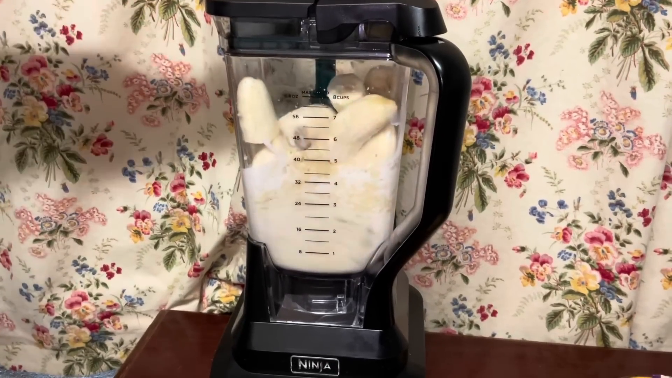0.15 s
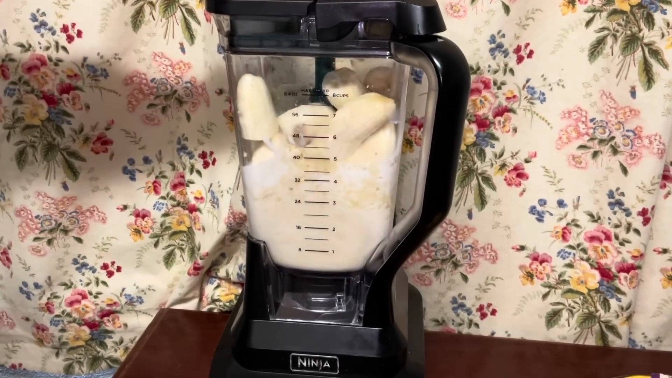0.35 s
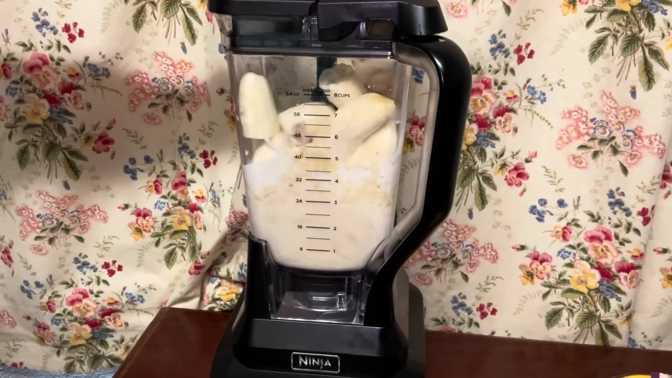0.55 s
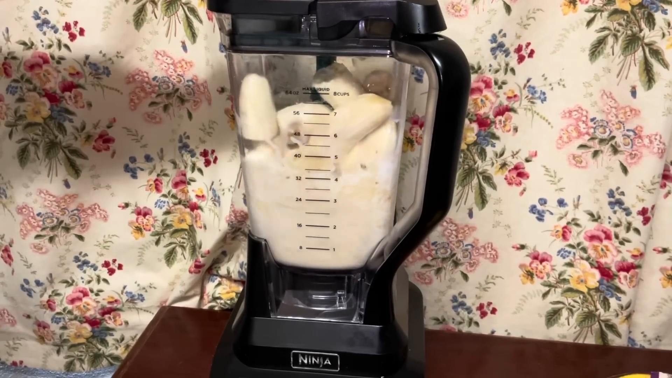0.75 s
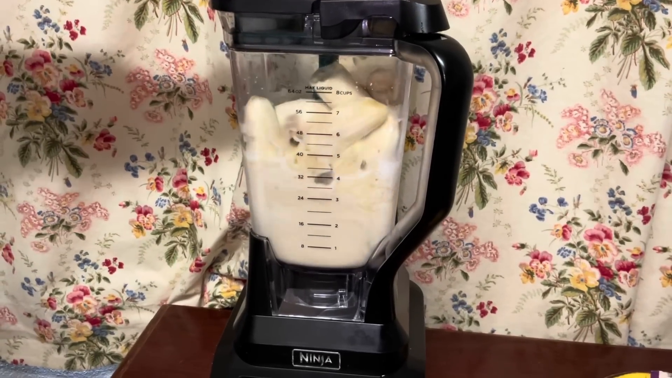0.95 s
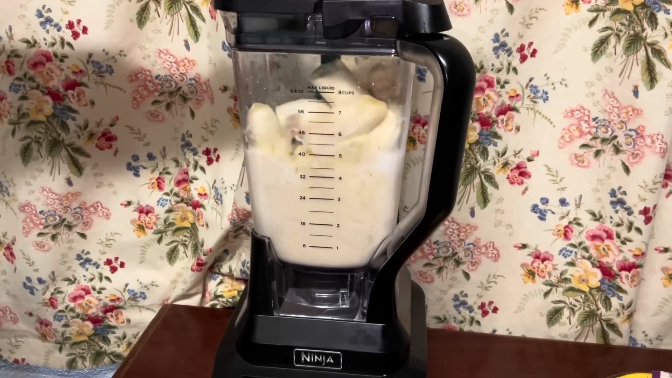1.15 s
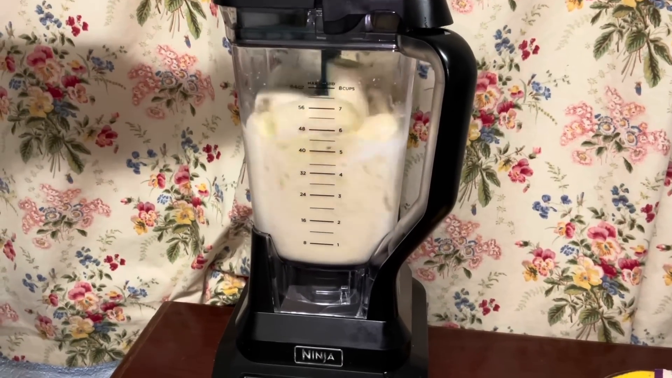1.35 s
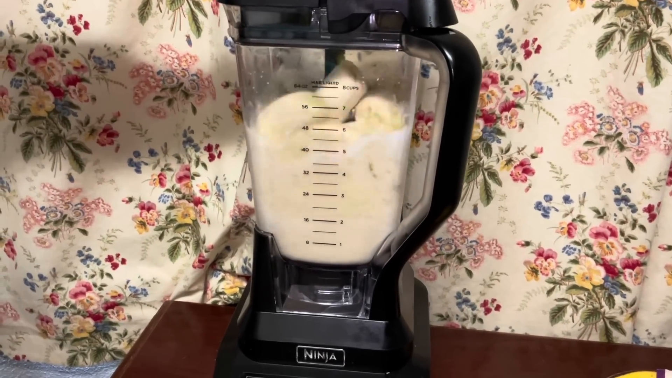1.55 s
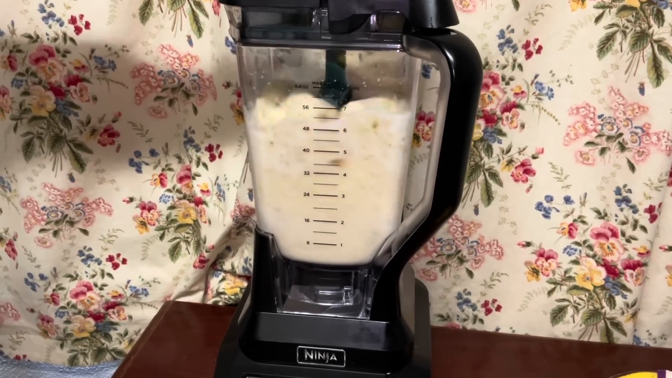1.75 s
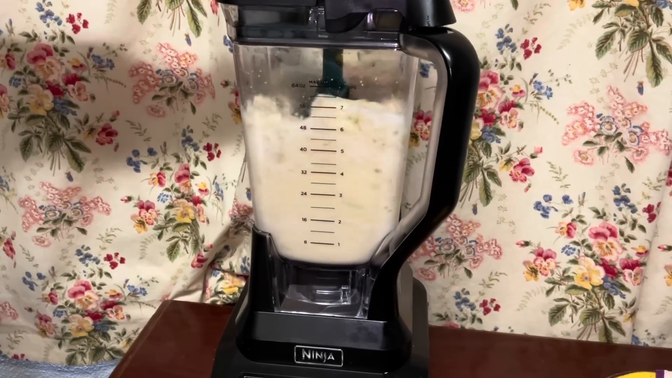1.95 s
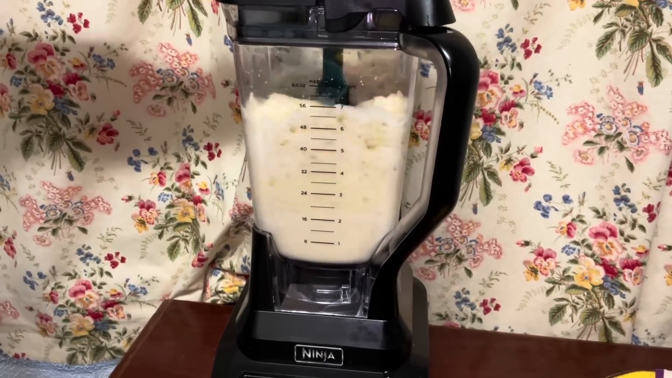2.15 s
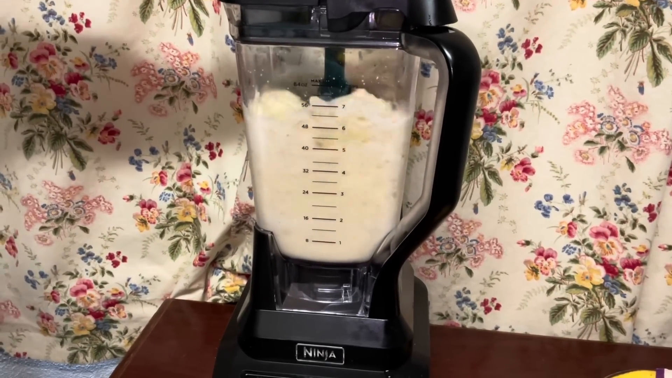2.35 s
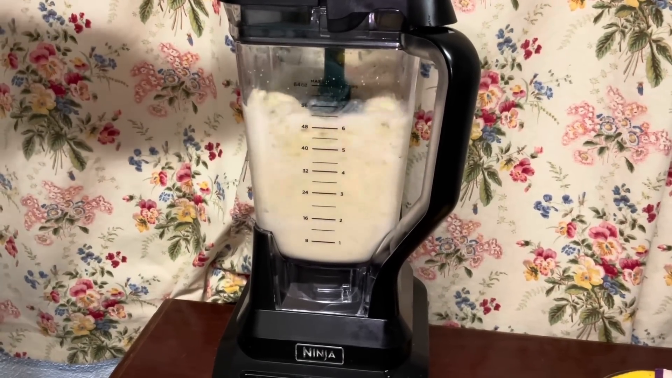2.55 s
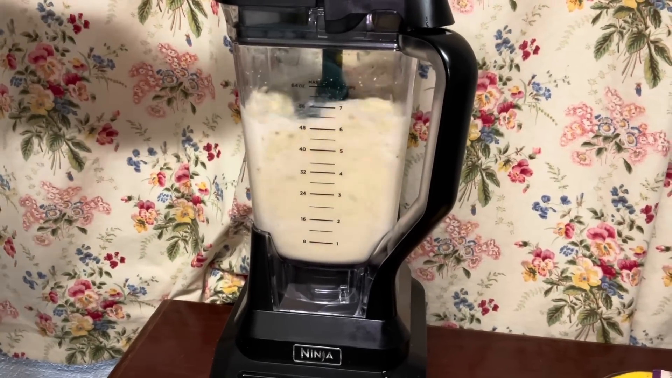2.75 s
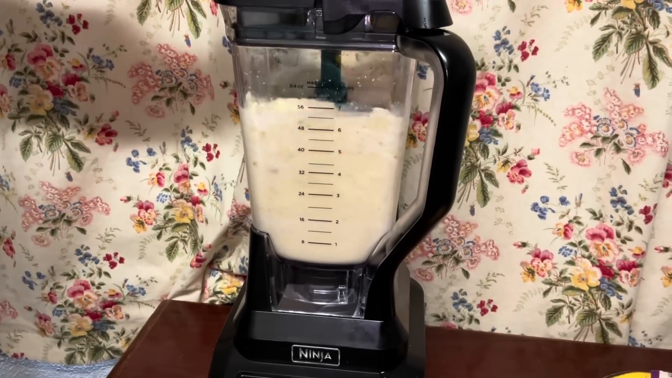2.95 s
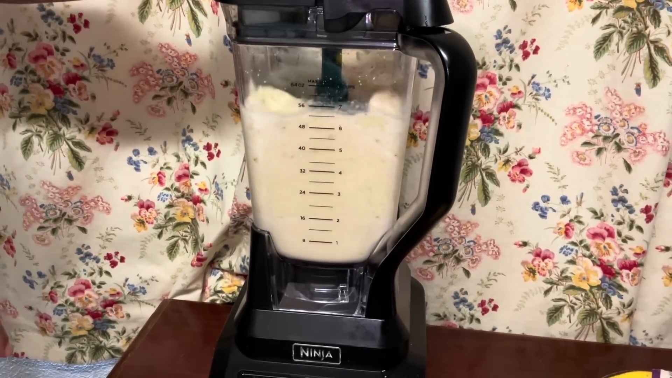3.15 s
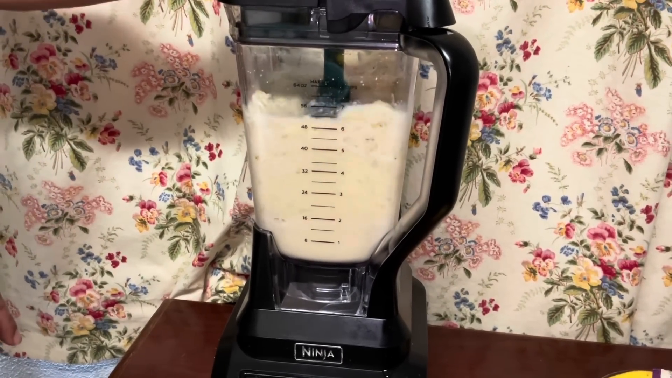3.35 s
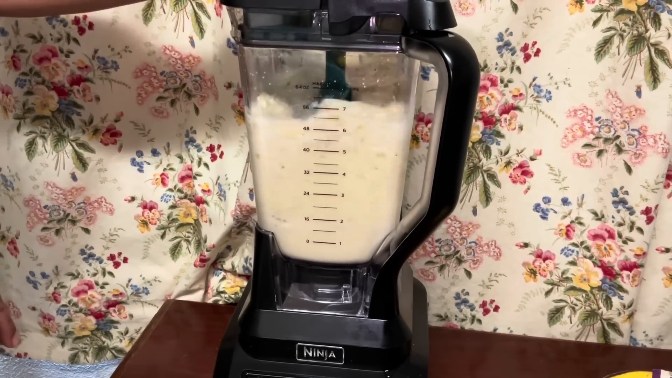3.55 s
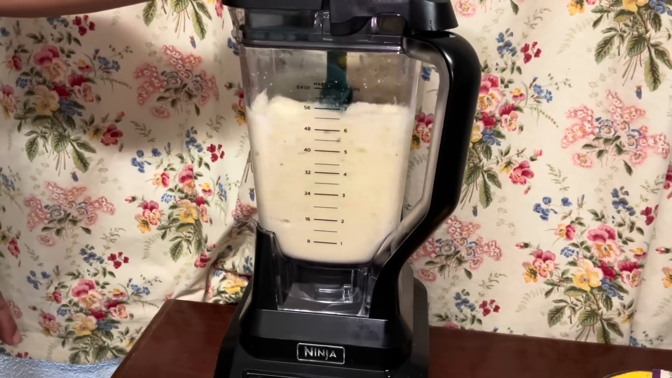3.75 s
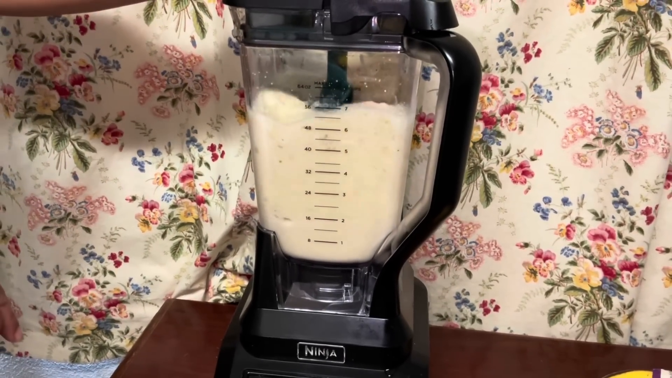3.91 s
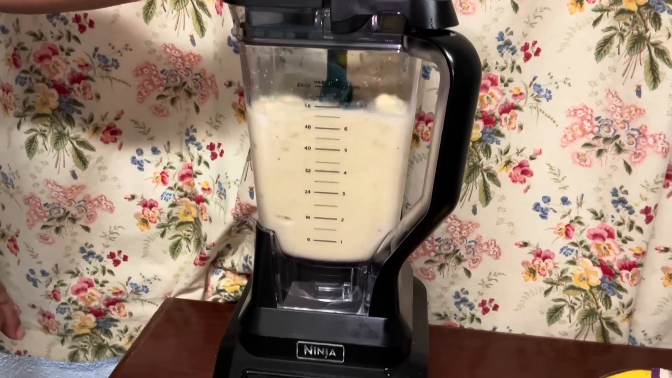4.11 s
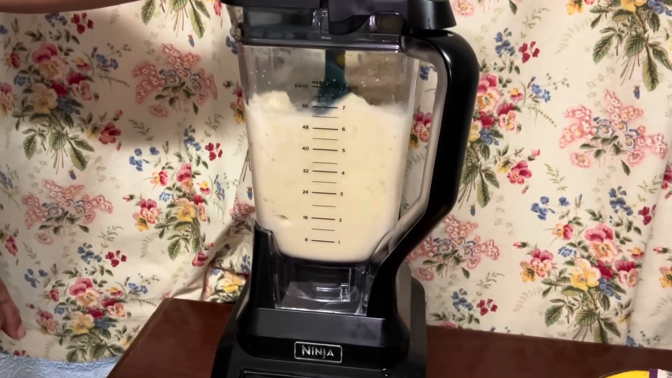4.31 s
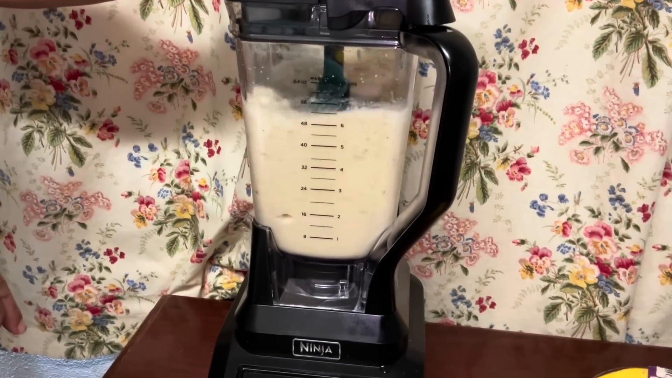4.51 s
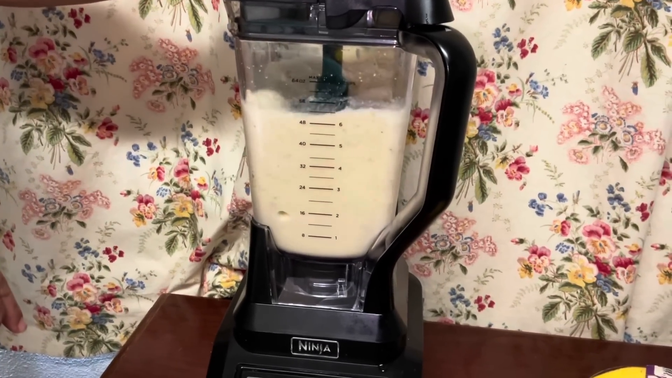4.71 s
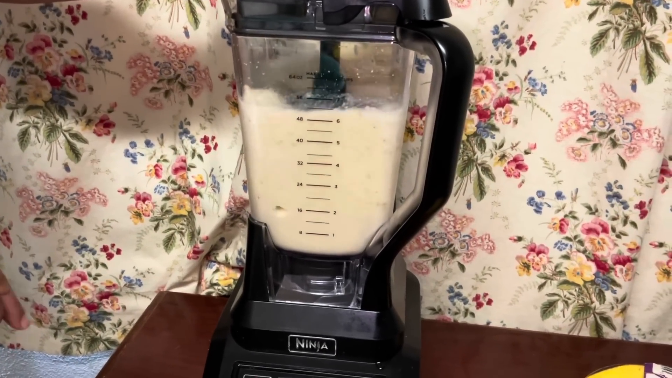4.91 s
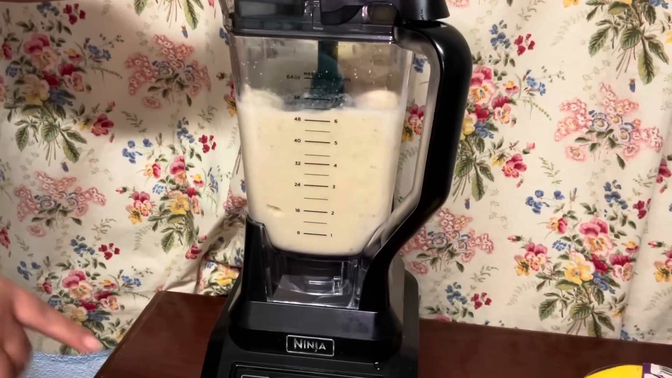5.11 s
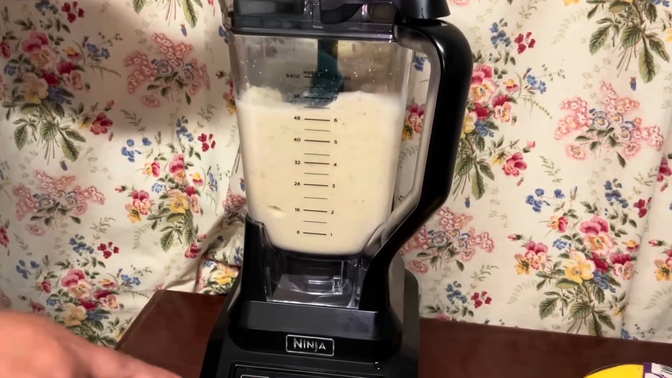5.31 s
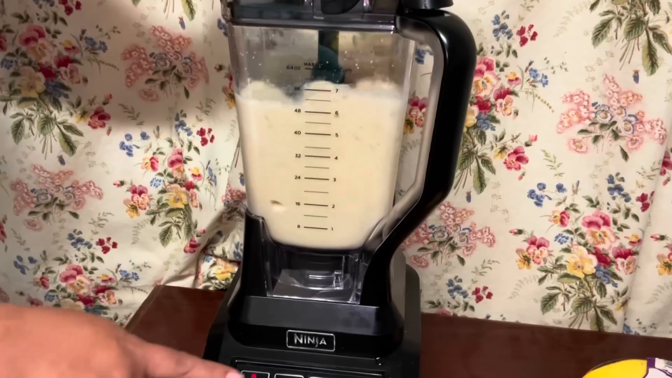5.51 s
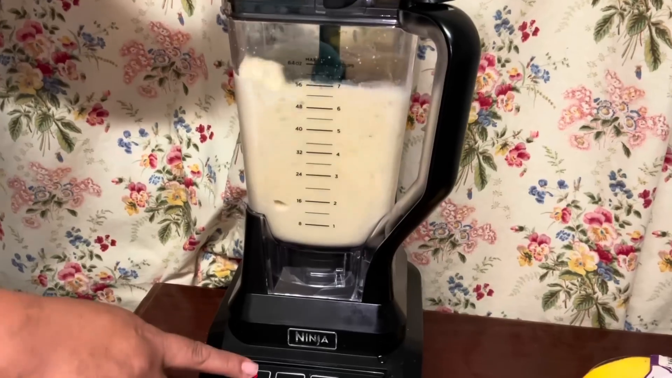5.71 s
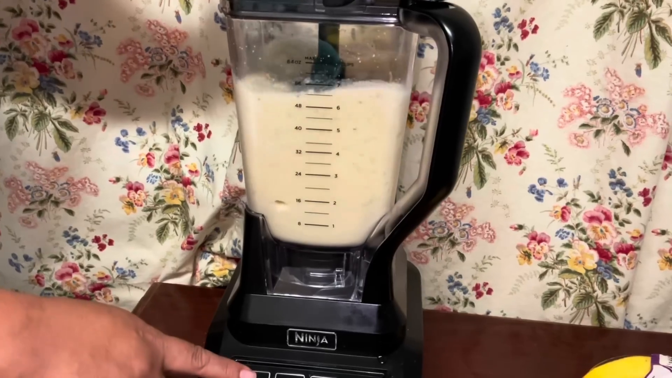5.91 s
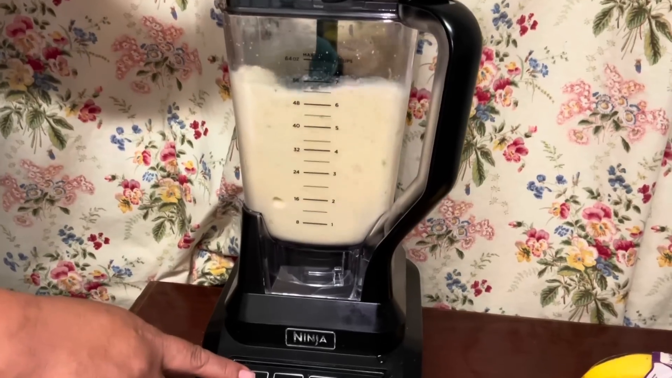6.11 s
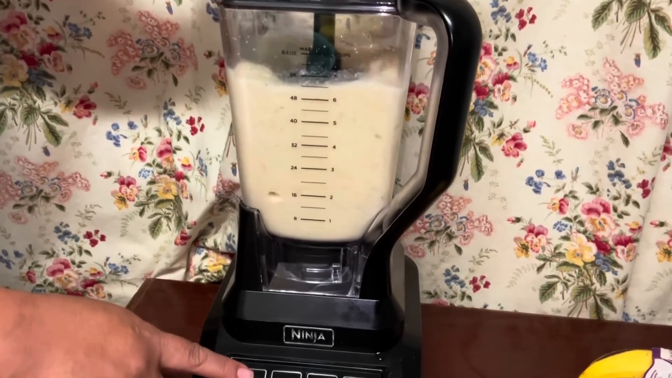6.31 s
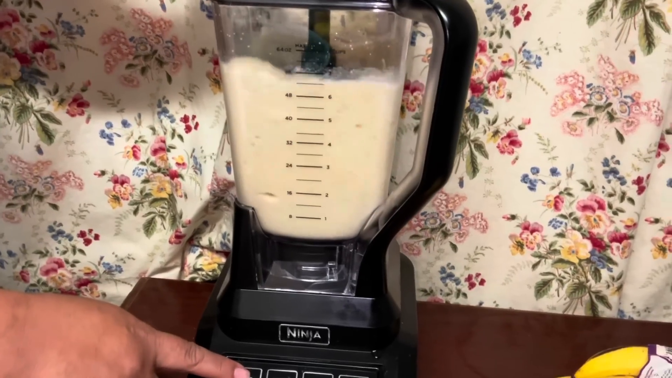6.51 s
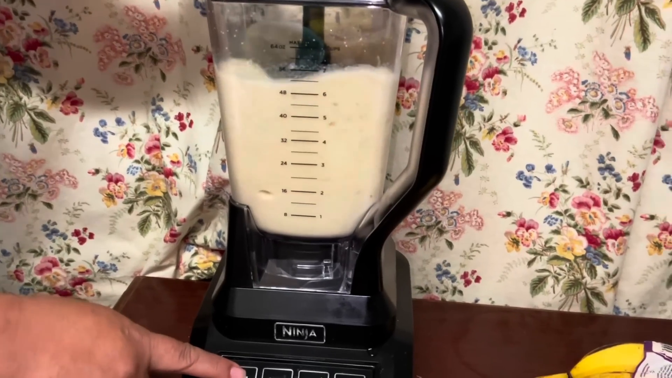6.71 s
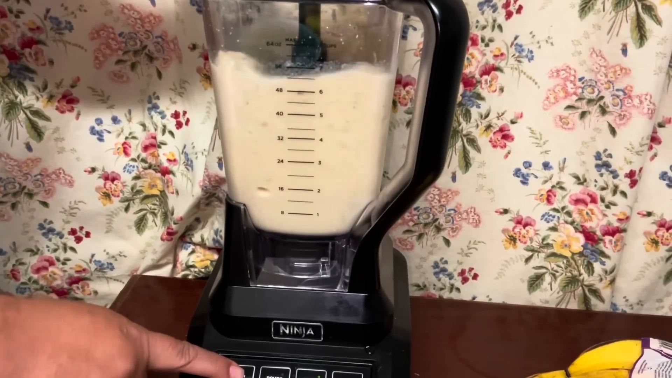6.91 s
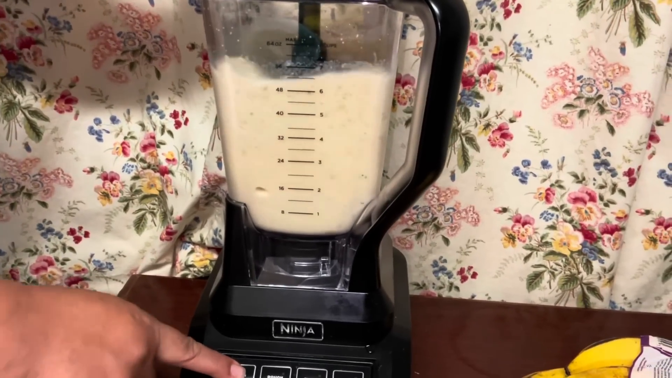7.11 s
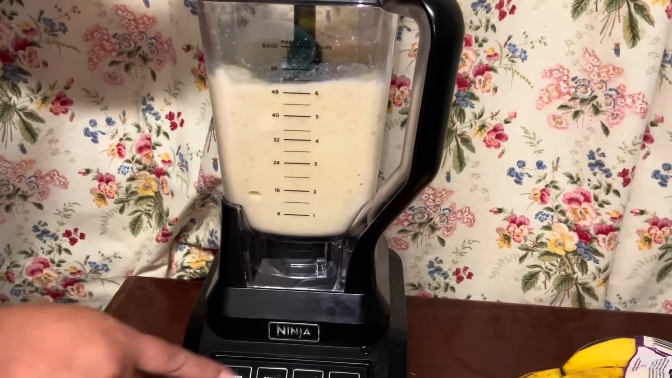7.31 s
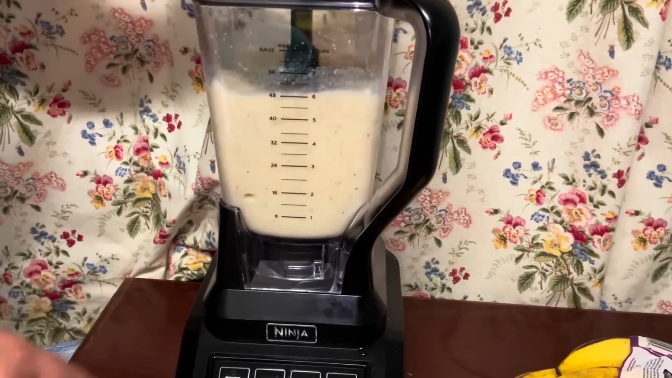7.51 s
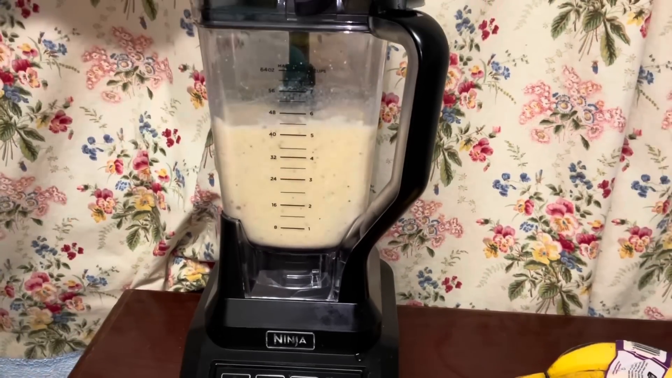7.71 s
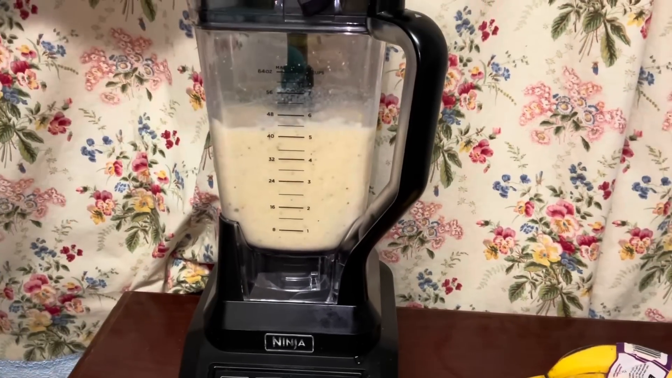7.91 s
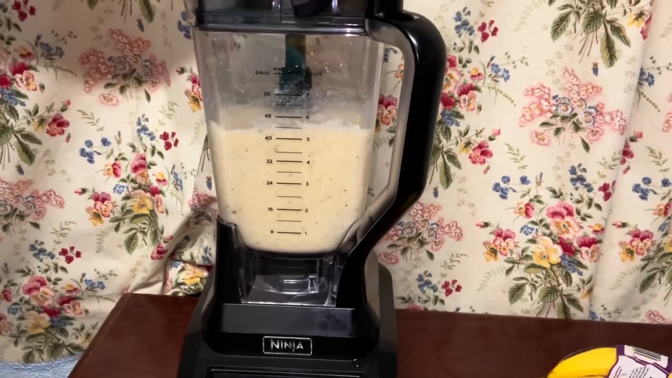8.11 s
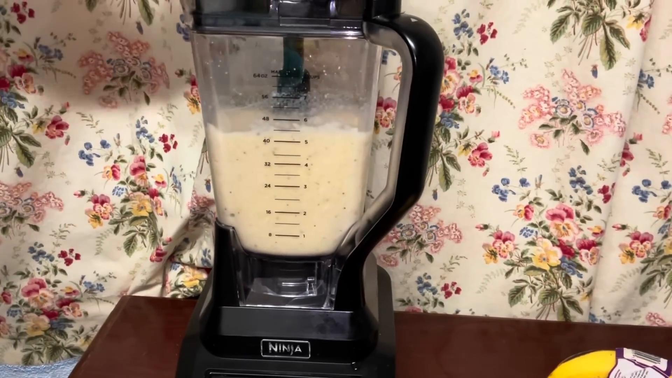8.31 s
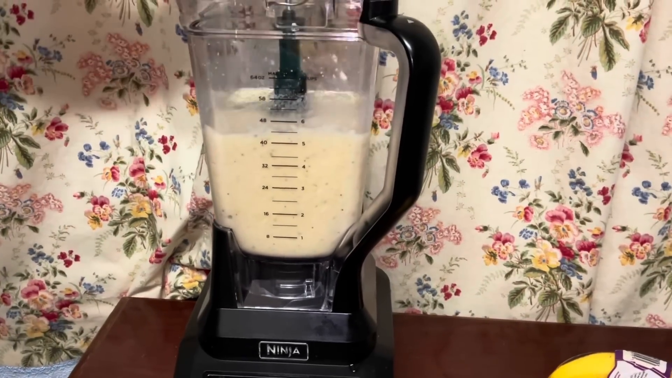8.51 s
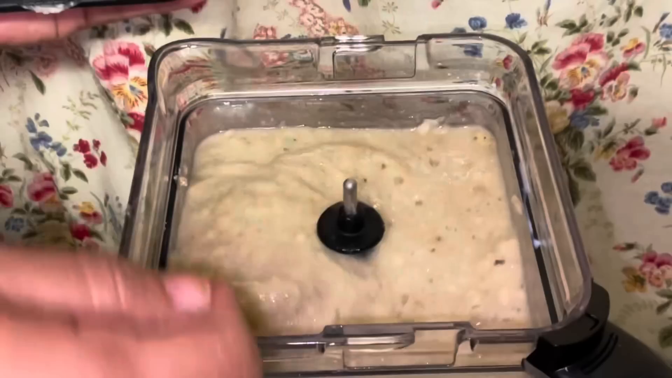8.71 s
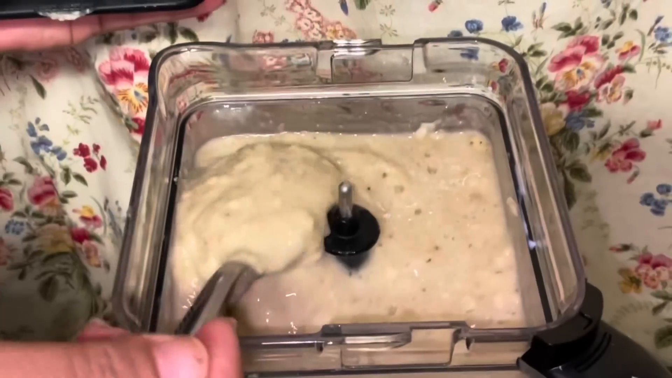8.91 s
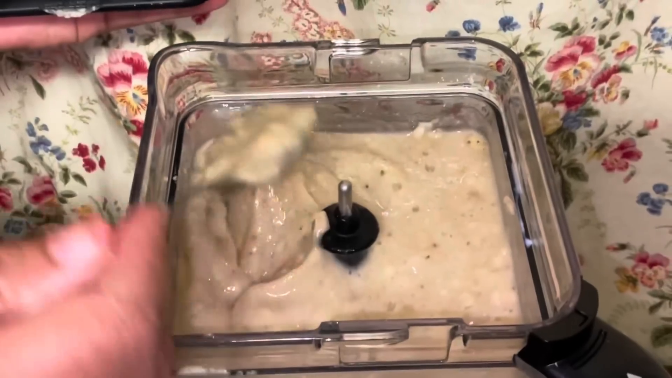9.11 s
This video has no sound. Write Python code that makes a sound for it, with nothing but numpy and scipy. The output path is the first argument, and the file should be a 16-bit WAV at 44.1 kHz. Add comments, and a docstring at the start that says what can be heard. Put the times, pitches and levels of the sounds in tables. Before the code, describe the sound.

From 0 s a blender runs at full power very close to the microphone: a low, buzzing drone, thick wet churning, broad airy hiss and a thin, piercing whine around 5.5 kHz. In the first one to two seconds it is slightly louder and rougher while fruit lumps are chopped; the whine weakens around 1.5 s, then returns, wavering in strength over a steady roar. At about 7 s the power goes off; drone and whine slide downward and weaken, but the sound breaks off abruptly at 7.6 s before the motor stops. A quiet kitchen with faint low hum remains. At 7.7 s a loud, sharp double plastic snap rings briefly with short room echo, followed by a smaller knock at 7.9 s. Light clicks and lid knocks run from 8.1 to 8.8 s, with a short, uneven rub around 8.35 s. At 8.95 s a dull, damped spoon tap ends it.

```python
"""A blender drones and whines close by as it purees banana and milk; switched off, it begins to coast down, and its
sound breaks off abruptly while it is still slowing.
Shaft harmonics give the drone and commutation the whine; filtered noise gives the churning and the hiss of air.
In the quiet kitchen the lid latch snaps open and the lid is worked off: noise bursts with decaying modes, then a rub.
Last, a spoon taps the wet jar, a short damped burst. Two microphone ports differ in phase and level; a room echoes."""
import sys
import numpy as np
from scipy import signal
from scipy.fft import rfft, irfft, next_fast_len
from scipy.io import wavfile
from scipy.ndimage import uniform_filter1d

SR = 44100
rng = np.random.default_rng(int(sys.argv[2]) if len(sys.argv) > 2 else 0)


def digitize_waveform(pressure):
    """Quantize a signal to 16-bit integers and store it at the path in sys.argv[1].

    Rows of a 2-D input are taken as channels; values are limited to [-1, 1].
    """
    field = np.atleast_2d(pressure).T
    bounded = np.clip(field, -1, 1)
    quanta = np.round(bounded * 32767).astype(np.int16)
    wavfile.write(sys.argv[1], SR, quanta)


N = 403515
T = np.arange(N) / SR
SIZE = next_fast_len(N + SR)
FREQ = np.maximum(np.fft.rfftfreq(SIZE, 1 / SR), 1)

# motor under power: [t/s, whine pitch f/Hz]
MOTOR_PITCH = [(0.0, 5498), (0.36, 5550), (0.66, 5516), (0.9, 5528), (1.2, 5492), (1.38, 5447),
               (1.75, 5455), (1.92, 5451), (2.94, 5493), (3.06, 5478), (3.18, 5490), (4.14, 5520),
               (4.44, 5500), (5.46, 5514), (6.12, 5490), (6.42, 5506), (6.92, 5510)]
GEAR_RATIO, COMMUTATOR_BARS = 4, 24
# once switched off, drag slows the shaft in proportion to its speed and friction at a steady rate
OFF_S, DRAG_S, FRICTION_HZ_PER_S = 6.975, .76, 20.4
# the sound of the machine breaks off abruptly while the shaft still turns
BREAK_OFF_S, BREAK_OFF_FADE_S = 7.615, 0.026
# time in which the lumps of fruit are cut down to about a third
LUMPS_S = 0.99

# laws of each layer: (relative level/dB in smooth puree at full speed, level/dB added by whole lumps,
# power of the speed that the amplitude follows)
DRONE_LAW = (-22.5, 1, 1.95)
RUMBLE_LAW = (-43.5, 3.6, 0.72)
CHURN_LAW = (-26, .8, 0.95)
CHOP_LAW = (-31, 4, 1.75)
AIR_LAW = (-26.5, 3.05, 1.99)

# shaft harmonics: [multiple of the turn rate, relative level/dB]
SHAFT_HARMONICS = [(1, -43.5), (2, -39.5), (3, -26), (4, -29.5), (5, -39.5), (6, -31), (7, -44), (8, -35),
                   (9, -36.5), (10, -42.5), (11, -39.5), (12, -41), (15, -53), (16, -38.5), (44, -35),
                   (48, -51), (52, -29.5), (176, -49.5), (188, -47.5), (208, -59.5)]
# resonance of the table top under the blade strokes: centre, width and level at the peak
TABLE_HZ, TABLE_WIDTH_HZ, TABLE_DB = 76, 18, -32

# turbulence through jar and housing: [f/Hz, relative spectral level/dB]
TURBULENCE_COLOUR = [(30, -37), (46, -32), (72, -10), (100, -23), (150, -0.5), (260, 2), (400, 1),
                     (520, -3), (760, -6.5), (1400, -12.5), (1800, -7), (2350, -8), (2900, -13),
                     (4700, -11), (6200, -13.5), (7200, -19), (10500, -22), (15500, -27.5)]
# housing resonances: [f/Hz, width/Hz, level/dB of the peak added to a flat gain of 1]
HOUSING_MODES = [(1796, 86, -4.5), (2240, 94, 1.5), (4790, 220, -8.5), (8360, 460, -4.5)]
# patterns repeated with each turn of gears or rotor: [multiple of that turn rate, relative level/dB]
GEAR_PATTERN = [(12, -13), (30, -11.5), (70, -5), (92, -10.5), (104, 2.5), (112, 5.5), (122, -7.5),
                (160, -10), (220, -24.5), (270, -21)]
ROTOR_PATTERN = [(14, -16), (28, -11.5), (36, 1.5), (44, 16.5), (52, -20.5), (60, -13.5), (68, -7)]

# commutator tones under power: [t/s, relative whine level/dB, relative overtone level/dB]
WHINE_LEVELS = [(0.0, -33, -43), (1.14, -35.5, -51), (1.45, -46, -52), (1.68, -43, -47), (2.28, -39, -41),
                (2.46, -37.5, -55), (3.06, -37.5, -44), (3.9, -32, -56.5), (4.08, -33.5, -46),
                (5.28, -34.5, -45), (5.46, -37, -48), (6.06, -30, -37.5), (6.92, -36, -40.5)]
# powers of the speed that the whine and its overtones follow
WHINE_POWER, OVERTONE_POWER = 6, 1.7
TOP_HZ = 15900

# two microphone ports: [f/Hz, left minus right level/dB, left lag/rad, relative room level/dB, room width/dB]
MICROPHONE_PORTS = [(60, -1, 0, -22, -4), (200, -2.5, .4, -18, -2), (400, -5.5, .5, -9, 0),
                    (600, -5.5, .2, -1, 0), (820, -5.5, 2.6, -2, 0), (1400, -5.5, 2.6, 4, 0),
                    (2200, -2.5, 2.3, -7, 0), (2900, -1, 3.2, -8, 0), (4200, 0, 6.2, -9, -2),
                    (6500, -.5, 6.3, -4, -1), (7400, -1, 5.9, -4, -2), (8200, 0, 6.28, -7, -24)]
ROOM_T60_S, ROOM_TREBLE_T60_S = 0.25, 0.26

# quiet kitchen: [f/Hz, relative spectral level/dB]
KITCHEN_COLOUR = [(25, -4), (55, 5.5), (120, -6.5), (200, -6), (450, -10.5), (800, -25), (1600, -28.5),
                  (3000, -38), (8000, -47), (15000, -65.5)]
# appliance hum: [f/Hz, peak level/dB relative to the rms of the kitchen noise]
APPLIANCE_HUM = [(57.5, -4), (119.5, -6)]
KITCHEN_DB = -52.5

# brief dips of the overall level: [t/s, depth/dB, half width/s at 1/e of the depth]
LEVEL_DIPS = [(7.623, -6.5, 0.011), (8.748, -21, 0.015)]

# plastic contacts: [t/s, relative level/dB, low thud level/dB against the body, treble tilt/dB,
# decay/ms, f/Hz of the favoured modes]
PLASTIC_KNOCKS = [(7.7252, -11.5, 3, 4, 9.2, 455), (7.7297, 0.5, -8.5, 8, 2.9, 895),
                  (7.922, -20.5, -8.5, -13.5, 10, 3480), (8.123, -29, -3, -12, 7.4, 1100),
                  (8.148, -33, 14.5, 3, 8.2, 1100), (8.183, -40.5, 8, 4, 15.2, 900),
                  (8.33, -36, 4.5, -10, 8, 900), (8.357, -22, 0, 1, 6.7, 4400),
                  (8.394, -27.5, 1, -9, 7, 565), (8.42, -34.5, 25, -5, 9.2, 565),
                  (8.469, -36.5, 16, 10, 6, 5400), (8.545, -25.5, -6, 8, 4.75, 5400),
                  (8.577, -20.5, -8, 6, 3.4, 1378), (8.685, -44, 3, 9, 3.8, 8350),
                  (8.778, -42, -17, -19, 2.6, 1900)]
# colour of a plastic contact: [f/Hz, relative spectral level/dB]
CLACK_COLOUR = [(100, -6), (450, -2.5), (900, -0.5), (1500, -4), (2100, -2), (2700, -3.5), (3800, -4.5),
                (5400, -5), (8000, -7.5), (15500, -22.5)]
# lid and jar modes: [f/Hz, relative level/dB, t60/s]
LID_AND_JAR_MODES = [(450, -1.5, 0.22), (575, -1, 0.26), (880, -4, .1), (1100, -9.5, .12),
                     (1370, -5.5, .12), (1870, -7, .12), (3380, 4, .15), (3470, 0, .19), (3741, -2.5, .11),
                     (5300, -8, .15), (8350, -6, .23)]
# ringing of the plastic relative to the nominal contact level
RING_DB = -19.5

# one stroke of the lid along the rim: it grips, holds, then slides more and more freely until it lifts off
RUB_S, RUB_LENGTH_S, RUB_DB = 8.325, .31, -45.5
RUB_ATTACK_S, RUB_HOLD_S, RUB_FADE_DB_PER_S = .035, .04, 106
# colour of the rubbing: [f/Hz, relative spectral level/dB]
RUBBING_COLOUR = [(100, -13), (300, 8.5), (565, 3), (900, -17), (1500, -11.5), (2700, -7), (4400, -3.5),
                  (6000, -21.5), (11000, -25), (15000, -41)]

# spoon on the wet jar wall: [f/Hz, relative spectral level/dB]
SPOON_COLOUR = [(150, -14), (450, 4), (800, -2), (1300, 4), (1900, -1), (2300, -23), (2700, -35),
                (3600, -30), (6000, -46), (15000, -64.5)]
SPOON_S, SPOON_DB = 8.9435, -35.5


def undb(db):
    """Logarithmic measure: decibels to amplitude gain."""
    return 10 ** (np.asarray(db) / 20)


def unit(x):
    """Normalisation: scale to rms 1."""
    return x / np.sqrt(np.mean(x ** 2))


def curves(rows):
    """Linear interpolation: each column of a time table at every sample."""
    s, *columns = np.transpose(rows)
    return [np.interp(T, s, c) for c in columns]


def spectra(rows, hz=FREQ):
    """Logarithmic frequency scale: each column of a frequency table, joined on a log axis."""
    points, *columns = np.transpose(rows)
    return [np.interp(np.log(hz), np.log(points), c) for c in columns]


def shape(x, gain):
    """Linear filtering: multiply the spectrum by a gain per frequency."""
    return irfft(rfft(x, SIZE) * gain, SIZE)[..., :N]


def band(lo_hz, hi_hz, hz=FREQ):
    """Band limiting: steep edges, so that neighbouring bands with a shared edge add up in power."""
    return ((1 + (lo_hz / hz) ** 12) * (1 + (hz / hi_hz) ** 12)) ** -.5


def boost(hz, centre_hz, width_hz, db):
    """Resonance: a single peak added to a flat gain of 1."""
    return 1 + undb(db) / (1 + (2 * (hz - centre_hz) / width_hz) ** 2)


def noise(gain):
    """Random excitation: coloured noise of rms 1."""
    return unit(shape(rng.standard_normal(N), gain))


def walk(rate):
    """Random modulation: a slow fluctuation of rms 1 with about rate new values a second."""
    steps = np.interp(T * rate, np.arange(2048), rng.standard_normal(2048))
    return unit(uniform_filter1d(steps, int(SR / rate / 2)))


def slowing(full_hz):
    """Viscous drag and dry friction: shaft speed as a share of its speed under power, at least a tenth."""
    coast_s = np.maximum(T - OFF_S, 0)
    friction = FRICTION_HZ_PER_S * DRAG_S / full_hz
    return np.maximum((1 + friction) * np.exp(-coast_s / DRAG_S) - friction, .1)


def shaft(turns, turn_hz, wobble_db=2.6, sway_rad=0.29):
    """Harmonic excitation: blades and unbalance shake the jar at turn-rate multiples; lumps make each waver."""
    out = 0
    for multiple, db in SHAFT_HARMONICS:
        k = round(multiple)
        phase = 2 * np.pi * (k * turns + rng.random()) + sway_rad * walk(12)
        level = undb(db + wobble_db * walk(15))
        out = out + band(52.0, SR, k * turn_hz) * level * np.sin(phase)
    return np.sqrt(2) * out / np.linalg.norm(undb(np.array(SHAFT_HARMONICS)[:, 1]))


def table_top(turns, turn_hz):
    """Forced resonance: two blade strokes a turn push the table top, which booms most near its own pitch."""
    response = 1 / (1 + (2 * (2 * turn_hz - TABLE_HZ) / TABLE_WIDTH_HZ) ** 2)
    return np.sqrt(2) * undb(TABLE_DB) * response * np.sin(4 * np.pi * turns)


def housing():
    """Resonant radiation: the product of the plastic shell's peaks at each frequency."""
    return np.prod([boost(FREQ, hz, width_hz, db) for hz, width_hz, db in HOUSING_MODES], axis=0)


def buzz(turns, envelope):
    """Periodicity: an uneven scraping pattern comes round again with every turn."""
    multiple = np.arange(2049)
    db = np.interp(multiple, *np.transpose(envelope), left=-120, right=-120)
    harmonics = rng.standard_normal(len(db)) + 1j * rng.standard_normal(len(db))
    pattern = irfft(undb(db) * harmonics)
    return unit(np.interp(turns, np.arange(len(pattern)) / len(pattern), pattern, period=1))


def mixture(turns, rumble_db, churn_db, chop_db, air_db, swirl=0.22, lumps_db=1.18):
    """Turbulence and amplitude modulation: puree and air noise swell with rotation; gears and rotor buzz."""
    colour = undb(spectra(TURBULENCE_COLOUR)[0]) * housing()
    sweep = np.cos(2 * np.pi * turns)
    rumble = noise(colour * band(20, 110)) * undb(rumble_db + 2.5)

    churn_level = undb(churn_db - 0.74 + lumps_db * walk(18))
    churn = noise(colour * band(105, 577)) * churn_level * (1 + swirl * np.cos(6 * np.pi * turns))

    chop_level = undb(chop_db + 5.5 + 0.83 * walk(20))
    chop = noise(colour * band(767, 3160)) * chop_level * (1 + 0.042 * sweep)

    air_level = undb(air_db + 0.63 + 0.62 * walk(15))
    air = noise(colour * band(2410, 13350)) * air_level * (1 + 0.077 * sweep)

    gears = undb(-10.5) * buzz(turns, GEAR_PATTERN)
    rotor = undb(-17.0) * buzz(GEAR_RATIO * turns, ROTOR_PATTERN)
    return rumble + churn + chop + air + (gears + rotor) * undb(air_db)


def commutator(cycles, whine_db, overtone_db, vent_hz=8600, vent_width_hz=650, vent_db=11,
               shell_hz=5300, shell_width_hz=1600, shell_db=-2):
    """Commutation: brushes tick over bars; as the rotor slows, overtones slide through two base resonances."""
    whine = np.sin(2 * np.pi * cycles) * undb(whine_db + 1.3 * walk(30))
    pitch_hz = np.gradient(cycles) * SR
    overtones = 0
    for k in range(2, 8):
        # each overtone fades out towards the upper limit
        audible = np.clip((TOP_HZ - k * pitch_hz) / 4000, 0, 1)
        overtones = overtones + np.sin(2 * np.pi * k * cycles) * audible * (2 / k) ** 0.71
    overtones = overtones * undb(overtone_db - 3.0 + 3.1 * walk(40))
    base = boost(FREQ, vent_hz, vent_width_hz, vent_db) * boost(FREQ, shell_hz, shell_width_hz, shell_db)
    return np.sqrt(2) * (whine + shape(overtones, base))


def ports(near, room_mid, room_side, distance_db):
    """Interchannel phase and level: left lags and is weaker over most of the range; the room reaches both."""
    balance_db, lag, room_db, width_db = spectra(MICROPHONE_PORTS)
    sign = np.array([[1], [-1]])
    # a greater distance raises the share of the room
    wet, width = undb(room_db + distance_db), undb(width_db)
    direct = rfft(near, SIZE) * np.exp(-1j * lag * np.array([[1], [0]]))
    room = rfft(room_mid, SIZE) + sign * width * rfft(room_side, SIZE)
    room = room / np.sqrt(1 + width ** 2)
    mixed = (direct + wet * room) / np.sqrt(1 + wet ** 2)
    return irfft(undb(sign * balance_db / 2) * mixed, SIZE)[:, :N]


def blender(whine_gain_db=2.5, overtone_gain_db=2.5):
    """Common drive: one shaft speed sets all pitches and levels; drone and turbulence also ease as lumps go."""
    bars_per_turn = GEAR_RATIO * COMMUTATOR_BARS
    full_hz = curves(MOTOR_PITCH)[0] / bars_per_turn
    speed = slowing(full_hz)
    speed_db, lumps = 20 * np.log10(speed), np.exp(-T / LUMPS_S)
    laws = (DRONE_LAW, RUMBLE_LAW, CHURN_LAW, CHOP_LAW, AIR_LAW)
    drone_db, *turbulence_db = (db + lumps_db * lumps + power * speed_db for db, lumps_db, power in laws)
    turn_hz = full_hz * speed * (1 + .0005 * walk(25))
    turns = np.cumsum(turn_hz) / SR
    drone = shaft(turns, turn_hz) * undb(drone_db) + table_top(turns, turn_hz)
    whine_db, overtone_db = curves(WHINE_LEVELS)
    whine = commutator(turns * bars_per_turn, whine_db + whine_gain_db + WHINE_POWER * speed_db,
                       overtone_db + overtone_gain_db + OVERTONE_POWER * speed_db)
    # each face of jar and housing radiates its own turbulence; the far ones arrive by way of the walls
    front, back, flanks = (mixture(turns, *turbulence_db) for _ in range(3))
    return ports(front + drone + whine, back, flanks, distance_db=2.5)


def kitchen():
    """Stationary background: low room rumble with an appliance hum."""
    hum = sum(undb(db) * np.sin(2 * np.pi * hz * T) for hz, db in APPLIANCE_HUM)
    colour = undb(spectra(KITCHEN_COLOUR)[0])
    side = undb(-6.5) * noise(colour * band(200, SR)) * np.array([[1], [-1]])
    return (noise(colour) + hum + side) * undb(KITCHEN_DB)


def contact(s, colour, decay_s, rise_s=0.0012):
    """Impact excitation: a short burst of crunching at time s, coloured by the sum of the given tables."""
    t = T[:SR // 8]
    hz = np.maximum(np.fft.rfftfreq(len(t), 1 / SR), 1)
    gain = undb(sum(spectra(rows, hz)[0] for rows in colour))
    crunch = unit(irfft(rfft(rng.standard_normal(len(t))) * gain, len(t)))
    burst = crunch * np.exp(-t / decay_s) * (1 - np.exp(-t / rise_s))
    return np.pad(burst, (int(s * SR), N))[:N]


def lid(knock_db=-1, body_db=6, presence_db=2, presence_share=0.79, favour=0.35):
    """Modal excitation: latch and lid knock the jar; the spot that is hit decides which modes ring."""
    out = 0
    t = T[:SR // 3]
    for s, db, low_db, treble_db, decay_ms, spot_hz in PLASTIC_KNOCKS:
        tilt = [(600, body_db + low_db), (1700, body_db),
                (4000, presence_db + presence_share * treble_db), (8000, treble_db)]
        out = out + undb(db + knock_db) * contact(s, [CLACK_COLOUR, tilt], decay_ms / 1000)
        ring = 0
        for hz, mode_db, t60 in LID_AND_JAR_MODES:
            coupling = 0.13 + np.exp(-(np.log(hz / spot_hz) / favour) ** 2)
            ring = ring + undb(mode_db - 60 * t / t60) * coupling * np.sin(2 * np.pi * hz * t)
        out = out + undb(db + RING_DB) * np.pad(ring, (int(s * SR), N))[:N]
    return out


def room_tail():
    """Reverberation: dense echoes after a gap of 1 ms, with separate decay times below and above 6 kHz."""
    def fade(t60):
        """Exponential decay: noise falling by 60 dB in t60 seconds."""
        onset = np.clip(T / 0.001 - 1, 0, 1)
        return unit(rng.standard_normal(N) * undb(-60 * T / t60) * onset) / np.sqrt(N)
    low = rfft(fade(ROOM_T60_S), SIZE) * band(0.74, 6000)
    treble = rfft(fade(ROOM_TREBLE_T60_S), SIZE) * band(6000, SR)
    return low + treble


def rub(grip_db=5, sing_hz=600, sing_width_hz=60, sing_db=-3, sing_s=8.45, sing_length_s=0.046):
    """Stick-slip friction: the lid rubs unevenly along the rim; as it comes free, a panel of it sings."""
    t = T - RUB_S
    touch = np.clip(np.minimum(t, RUB_LENGTH_S - t) / RUB_ATTACK_S, 0, 1)
    fade_db = RUB_FADE_DB_PER_S * np.maximum(t - RUB_ATTACK_S - RUB_HOLD_S, 0)
    scrape = noise(undb(spectra(RUBBING_COLOUR)[0])) * touch * undb(grip_db * walk(150) - fade_db)
    # the flat part of the gain is removed, so only the resonance sounds
    panel = noise(boost(FREQ, sing_hz, sing_width_hz, 0) - 1)
    panel = panel * np.exp(-((T - sing_s) / sing_length_s) ** 2)
    return undb(RUB_DB) * (scrape + undb(sing_db) * panel)


def spoon(decay_s=0.005, room_db=-4):
    """Damped impact: a dull tap right in front of the microphone, damped by the puree."""
    tap = undb(SPOON_DB) * contact(SPOON_S, [SPOON_COLOUR], decay_s, rise_s=0.00034)
    return shape(tap, 1 + undb(room_db) * np.array([room_tail(), room_tail()]))


def scene():
    """Superposition: the blender's sound breaks off while it coasts; handling follows; the level dips twice."""
    machine = blender() * np.clip((BREAK_OFF_S - T) / BREAK_OFF_FADE_S, 0, 1)
    knocks = lid() + rub()
    room_mid, room_side = shape(knocks, room_tail()), shape(knocks, room_tail())
    handling = ports(knocks, room_mid, room_side, distance_db=0.5) + spoon()
    dips_db = sum(db * np.exp(-((T - s) / width_s) ** 2) for s, db, width_s in LEVEL_DIPS)
    return (machine + handling + kitchen()) * undb(dips_db)


def record(dry, gain_db=-0.16, treble_hz=15000, treble_width_hz=4500, treble_db=-7):
    """Tone and band limits: a gentle treble lift; the deep bass and the very top are cut."""
    bright = undb(gain_db) * shape(dry, boost(FREQ, treble_hz, treble_width_hz, treble_db))
    thin = signal.sosfilt(signal.butter(4, 46, "high", fs=SR, output="sos"), bright)
    return signal.sosfilt(signal.ellip(10, .2, 80, TOP_HZ, fs=SR, output="sos"), thin)


dry = scene()
out = record(dry)
digitize_waveform(out)
```